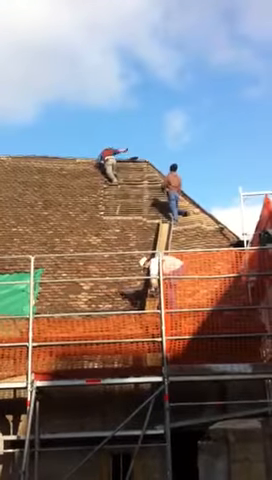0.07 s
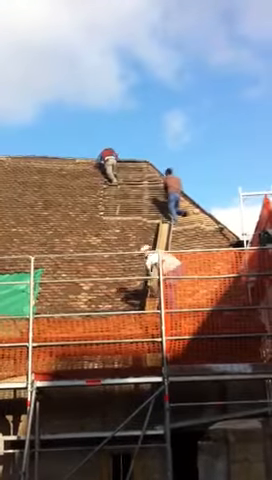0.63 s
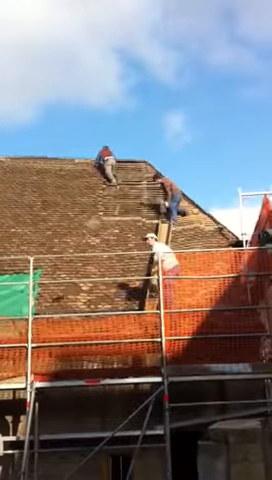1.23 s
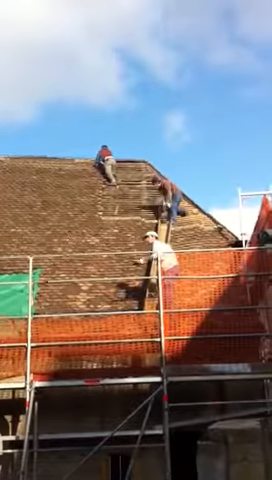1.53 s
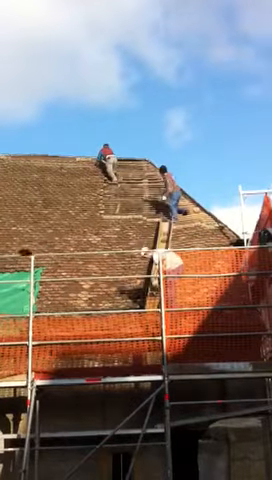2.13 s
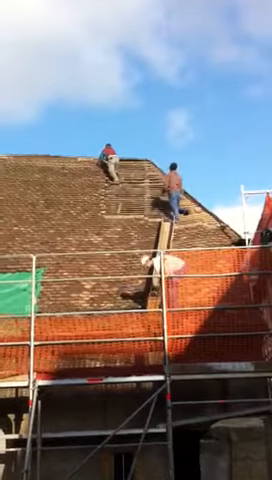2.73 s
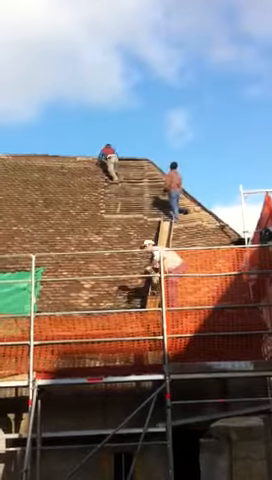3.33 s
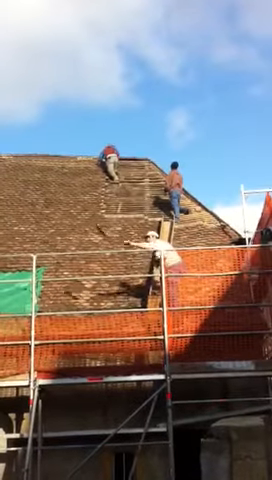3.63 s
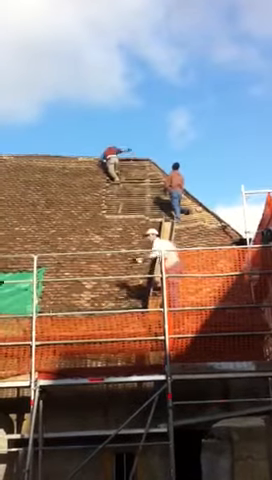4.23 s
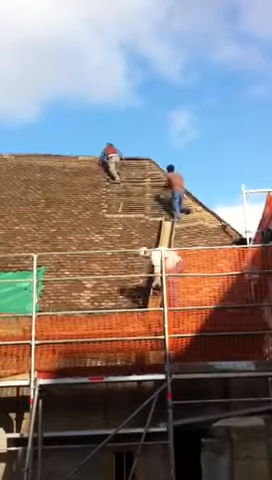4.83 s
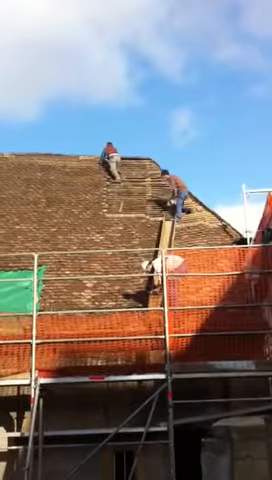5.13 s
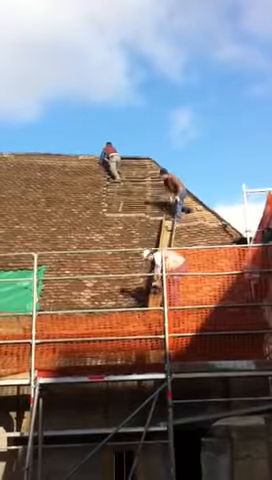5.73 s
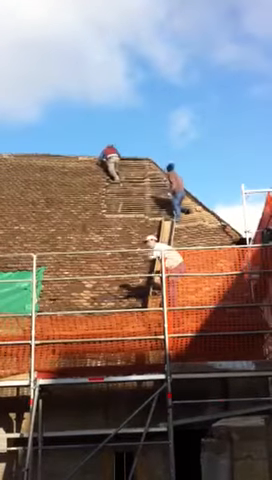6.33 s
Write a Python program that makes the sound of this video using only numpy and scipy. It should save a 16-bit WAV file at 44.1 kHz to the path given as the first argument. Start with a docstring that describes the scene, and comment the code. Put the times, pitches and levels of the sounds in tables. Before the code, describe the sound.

On an outdoor building site, roof tiles smash onto a pile at uneven intervals, each a sharp crack followed by a spray of ringing fragments and a trailing echo. The pile thuds and rumbles, and small pieces tumble and clink between crashes. Twice, before the loudest smash and again near the end, a run of dull knocks and grainy rubbing comes right at the microphone. The background is faint air.

```python
"""Clay tiles crash onto a heap and burst into rattling shards as workers toss them off a roof.
Each smash is a crack, then a spray of tiny fractures and ringing fragments. Some land with a low thud,
the heap rumbles as it settles, loose pieces clink, and the house fronts answer with a long tail.
Dull, hollow-sounding knocks, rubbing and dry ticks come close to the microphone, like handling noise,
over faint outdoor air."""
import sys
import numpy as np
from scipy import signal
from scipy.fft import rfft, irfft
from scipy.io import wavfile
from scipy.ndimage import uniform_filter1d

SR = 44100
rng = np.random.default_rng(int(sys.argv[2]) if len(sys.argv) > 2 else 0)


def wrap_up_sound(samples):
    """Save the sound to the file named by the first command line argument, as 16-bit audio."""
    columns = np.atleast_2d(samples).T
    # keep every value between -1 and 1, then stretch to whole-number steps
    tamed = np.clip(columns, -1, 1)
    steps = np.round(tamed * 32767).astype(np.int16)
    wavfile.write(sys.argv[1], SR, steps)


N = 285327
TIME = np.arange(SR) / SR  # one second, the canvas for a single hit
FREQS = np.fft.rfftfreq(SR, 1 / SR)


def amp(db):
    """Decibels to gain."""
    return 10 ** (np.asarray(db) / 20)


def unit_rms(x):
    """Scales a signal to an rms of 1."""
    return x / np.sqrt(np.mean(x ** 2) + 1e-20)


def curve_at(points, hz):
    """Reads a curve along a log-frequency axis."""
    point_hz, values = np.transpose(points)
    return np.interp(np.log(hz + 1), np.log(point_hz + 1), values)


def fade(t60, t=TIME):
    """A decay that falls 60 dB in t60 seconds."""
    return np.exp(-np.log(1000) * t / np.maximum(t60, 1e-4))


def add(mix, start, sound):
    """Drops a sound into the mix at start seconds."""
    part = mix[max(round(start * SR), 0):][:len(sound)]
    part += sound[:len(part)]


def mode(hz, t60):
    """One resonance ringing out."""
    return np.sin(2 * np.pi * hz * TIME) * fade(t60)


def clicks(per_s, spread_db, size):
    """Random contacts of either sign, a few much harder than the rest."""
    strength = amp(spread_db * np.minimum(rng.exponential(1, size), 4))
    return strength * rng.choice([-1, 1], size) * (rng.random(size) < per_s / SR)


def excite(drive, resonance):
    """Plays a signal through a resonance scaled to unit energy."""
    return signal.oaconvolve(drive, resonance / np.linalg.norm(resonance))[:N]


def snap(hz, t60, octaves=0.67, grit_db=2.9):
    """A dry snap: a short spill of tiny cracks in a broad band around its pitch."""
    band = unit_rms(np.exp(-.5 * (np.log2((FREQS + 1) / hz) / octaves) ** 2))
    cracks = unit_rms(clicks(8100, grit_db, SR)) * fade(t60)
    cracks = np.roll(cracks, 44)  # 1 ms of room for the filtered attack
    return .4 * irfft(rfft(cracks) * band, SR)[:SR // 2]


def shard(ring_s=0.043, count=14):
    """A broken piece rings briefly at its own random pitches."""
    t = TIME[:SR // 8]
    hz = FREQS[-1] * rng.uniform(0.02031, .7, (count, 1))
    t60 = ring_s * rng.uniform(0.28, 0.82, (count, 1))
    return (np.sin(2 * np.pi * hz * t) * fade(t60, t)).sum(0)


def rattle(cracks_per_s=2200, ring_db=-3, shards=10):
    """A second of breaking clay: dense cracks, and shards that ring as they collide."""
    cracks = unit_rms(clicks(cracks_per_s, 3.0, SR))
    rings = sum(signal.fftconvolve(clicks(120, 2.2, SR), shard())[:SR] for _ in range(shards))
    return cracks + amp(ring_db) * unit_rms(rings)


# The EQ of breaking clay. Each row: frequency in Hz, gain in dB.
SHATTER_EQ = [(24, -88), (40, -48), (180, -3.5), (249, -8.5), (297, -2.5), (329, -10), (363, -10),
              (392, -6), (630, -5), (873, -8), (1630, -6.5), (2150, -10.5), (3220, -11), (8770, -33),
              (16000, -46.5)]
# Band centres in Hz: bass, body, mids, treble, fizz.
SHATTER_BANDS_HZ = [160, 550, 1900, 5200, 11000]


def shatter(swell_s, t60, bands_db, first_touch=.16, treble_hurry=0.32, ripple_db=1.92):
    """The rattle swells as the tile breaks up and dies away, the treble first."""
    # the pieces under each tile resonate differently, in bands about 100 Hz wide
    ripple = uniform_filter1d(rng.standard_normal(len(FREQS)), size=110)
    ripple = unit_rms(uniform_filter1d(ripple, size=60))
    spectrum = rfft(rattle()) * amp(curve_at(SHATTER_EQ, FREQS) + ripple_db * ripple)
    attack = np.minimum(first_touch + (1 - first_touch) * TIME / swell_s, 1)
    since_swell = np.maximum(TIME - swell_s, 0)
    out = np.zeros(SR)
    for hz, db, share in zip(SHATTER_BANDS_HZ, bands_db, np.eye(len(SHATTER_BANDS_HZ))):
        crossover = curve_at(list(zip(SHATTER_BANDS_HZ, share)), FREQS)
        band = unit_rms(irfft(spectrum * crossover, SR))
        band_t60 = t60 * min(1, 2500 / hz) ** treble_hurry
        out += amp(db) * band * fade(band_t60, since_swell)
    return amp(-3.5) * attack * out


# Tiles hitting the heap. Each row: start in seconds, level in dB, opening gain of the swell from 0 to 1,
# swell in seconds, t60 in seconds, echo send in dB, then bass, body and treble in dB against the mids.
SMASHES = [ (0.000, -49, 0.48, .002, 0.33, -5, 7, 4, -3.5),
           (0.459, -21, 0.27, 0.035, 0.38, -17.5, -7.5, -10.5, 5.5),
           (2.185, -11.5, 0.58, .028, 0.53, -17.5, -20, 1, -2),
           (2.602, -36, 0.88, 0.01, 0.93, -9, 10.5, 11, 2.5),
           (2.644, -24.5, 0.28, 0.0045, 0.21, -11, -12.5, -1, 2),
           (2.674, -24, 0.42, 0.014, 0.46, -20.5, 7.5, 2.5, -1),
           (2.913, -14.5, 0.13, 0.055, 0.4, -15, 0, -1.5, -4),
           (4.875, -25.5, 0.47, 0.0043, 0.61, -17.5, -12, -8.5, -7.5),
           (4.891, -17, 0.49, 0.034, 0.37, -18.5, -16.5, -17.5, -5),
           (5.610, -22, 0.087, 0.042, 0.42, -15.5, -6, -6.5, -3.5)]


def smashes(fizz_db=-11, crack_db=-7):
    """Each tile lands with a crack and breaks up; returns the direct sound and the echo send."""
    direct, send = np.zeros((2, N))
    for start, db, touch, swell_s, t60, send_db, bass_db, body_db, treble_db in SMASHES:
        colour_db = np.array([bass_db, body_db, 0, treble_db, treble_db + fizz_db])
        burst = shatter(swell_s, t60, db + colour_db, first_touch=touch)
        add(burst, 0, amp(db + crack_db) * snap(hz=2100, t60=0.029))
        add(direct, start, burst)
        add(send, start, amp(send_db) * burst)
    return direct, send


def chatter(hz, length_s):
    """A shard chatters as it settles; each contact feeds the same dying mode."""
    contacts = clicks(900, 0.75, SR) * fade(length_s * 0.75)
    ring = signal.fftconvolve(contacts, mode(hz, length_s * .4))[:SR]
    return ring / (abs(ring).max() + 1e-12)


# Small shards. Each row: start in seconds, peak in dB, pitch in Hz, rough length in seconds.
SHARD_CLINKS = [(0.0, -49, 2654, 0.58), (0.0, -51, 4060, 0.34), (0.758, -39.5, 4850, 0.15),
                (0.755, -46.5, 5790, 0.31), (0.922, -43.5, 3600, .12), (0.924, -52, 3114, 0.22),
                (2.870, -39.5, 4480, 0.64), (4.299, -52, 1201, 0.82), (5.754, -50, 3960, .12)]


def clinks():
    """Small shards bounce and ring, one bright note each."""
    out = np.zeros(N)
    for start, db, hz, length_s in SHARD_CLINKS:
        add(out, start, amp(db) * chatter(hz, length_s))
    return out


# The colour of the outdoor bed. Each row: frequency in Hz, gain in dB.
AIR_EQ = [(18, -84), (30, -22.5), (109, -6), (204, 1.5), (280, -4), (404, -5), (540, -6), (600, -9),
          (1070, -9.5), (1220, -12.5), (1390, -14), (3310, -23), (3670, -23), (16000, -36)]


def air(level_db=-56.5, patchy_db=1.5):
    """Distant outdoor noise that drifts in patches."""
    hz, _, spectra = signal.stft(rng.standard_normal(N), SR, nperseg=2048)
    drift = uniform_filter1d(rng.standard_normal(spectra.shape), size=6, axis=1)
    patches = unit_rms(uniform_filter1d(drift, size=20, axis=0))
    spectra *= amp(curve_at(AIR_EQ, hz)[:, None] + patchy_db * patches)
    return amp(level_db) * unit_rms(signal.istft(spectra, SR)[1][:N])


# The long tail off the house fronts. Each row: frequency in Hz, t60 in seconds.
STREET_DECAY = [(150, 1.22), (600, 1.83), (2000, 1.16), (5000, 0.95), (10000, 0.82), (15000, 0.28)]


def echo(send, decay=STREET_DECAY, build_s=0.05, per_s=4000):
    """Scattered reflections build up, then each band dies at its own speed."""
    build = np.minimum(np.arange(2 * SR) / SR / build_s, 1) ** 2
    reflections = clicks(per_s, 0.63, 2 * SR) * build
    hz, t, spectra = signal.stft(reflections, SR, nperseg=256)
    spectra *= fade(curve_at(decay, hz)[:, None], t)
    tail = signal.istft(spectra, SR, nperseg=256)[1]
    return excite(send, tail)


# The low modes of the heap. Each row: pitch in Hz, level in dB.
HEAP_MODES = [(130, -12), (155, -3.5), (177, 9), (208, 2.5), (300, -4), (366, -4.5), (432, -1), (560, -9),
              (700, -6.5)]


def rumble(level_db=-9, per_s=160, rise_s=0.29, settle_t60=1.33):
    """Pieces shift inside the heap and bump its low modes, more so after a full-bodied smash."""
    settling = np.minimum(TIME / rise_s, 1) * fade(settle_t60)
    load = np.zeros(N)
    for start, db, *_, body_db, _ in SMASHES:
        add(load, start, amp(db + body_db) * settling)
    ring = sum(amp(db) * mode(hz, t60=.15) for hz, db in HEAP_MODES)
    bumps = load * unit_rms(clicks(per_s, 2.1, N))
    return amp(level_db) * excite(bumps, ring)


def chips(level_db=-48, per_s=500, flight_s=0.26, spread_s=.08):
    """Tiny chips thrown up by each smash patter down, louder after a hard one."""
    landing = np.exp(-.5 * ((TIME - flight_s) / spread_s) ** 2)
    shower = np.zeros(N)
    for start, db, *_ in SMASHES:
        add(shower, start, amp(db) * landing)
    chip = snap(hz=9550, t60=.04, octaves=0.88)
    patter = shower * unit_rms(clicks(per_s, 1.5, N))
    return amp(level_db) * excite(patter, chip)


# Loose pieces on the move. Each row: start in seconds, level in dB.
LOOSE_TUMBLES = [(0.335, -51), (3.29, -38.5), (5.071, -37), (5.207, -35.5), (5.274, -41.5), (6.197, -41)]
# Their colour in dB: bass, body, mids, treble, fizz.
TUMBLE_COLOUR_DB = [-6, -51.5, -1, -5.5, -15.5]


def tumbles():
    """Loose pieces tumble over the heap in short, quiet rattles."""
    out = np.zeros(N)
    for start, db in LOOSE_TUMBLES:
        add(out, start, amp(db) * shatter(swell_s=0.016, t60=0.33, bands_db=TUMBLE_COLOUR_DB))
    return out


# Dry ticks. Most are close-up grit; the 2.187 s row is the bright crack of the smash landing then, and the
# 2.433 s row is a chip thrown up by it. # Each row: start in seconds, level in dB, pitch in Hz, t60 in seconds.
DRY_TICKS = [(0.346, -39, 1120, 0.17), (1.171, -36.5, 1470, 0.011), (1.815, -25.5, 3050, 0.028),
             (1.865, -35, 4380, .033), (1.877, -33, 4000, 0.11), (2.126, -41, 4540, 0.077),
             (2.187, -22, 14000, .13), (2.433, -34, 12200, 0.18), (3.074, -33, 10400, .02),
             (3.204, -36, 10700, .017), (3.581, -26, 1310, 0.14), (3.58, -29, 4570, 0.044),
             (3.599, -27, 3200, 0.041), (5.75, -21, 1400, 0.53), (5.755, -21, 4100, 0.034),
             (6.117, -20.5, 2680, 0.075), (6.144, -34.5, 8250, 0.056), (6.422, -40, 3980, .03)]


def ticks():
    """Dry, gritty ticks, each a spill of tiny cracks; most are nearby, a few belong to a smash."""
    out = np.zeros(N)
    for start, db, hz, t60 in DRY_TICKS:
        add(out, start, amp(db) * snap(hz, t60))
    return out


# Low booms. Most rows are heavy landings on the heap; the rows at 3.696 s and 6.428 s are the low body of close
# knocks. # Each row: start in seconds, level in dB, pitch in Hz, t60 in seconds.
LOW_THUDS = [(0.464, -11, 184.8, .12), (0.494, -18.5, 190.4, .12), (2.678, -7.5, 160, 0.068),
             (2.961, -21, 177, 0.23), (3.696, -23.5, 193, 0.1), (4.882, -13, 146, 0.05),
             (5.629, -9.5, 150.6, 0.023), (6.428, -20.5, 252.4, 0.091)]


def thuds(attack_s=0.0052):
    """A low note with a faint octave: the heap booming under a heavy piece, or the low body of a close knock."""
    attack = 1 - np.exp(-TIME / attack_s)
    out = np.zeros(N)
    for start, db, hz, t60 in LOW_THUDS:
        boom = mode(hz, t60) + 0.16 * mode(2 * hz, t60)
        add(out, start, amp(db) * attack * boom)
    return out


def dull_knock(hz, peak_s=0.0028):
    """A dull, hollow-sounding knock: a few cycles that swell and die."""
    t = TIME[:SR // 20]
    swell = (t / peak_s * np.exp(1 - t / peak_s)) ** 2
    return swell * np.sin(2 * np.pi * hz * t)


# Knocks close to the microphone, like handling noise. Each row: start in seconds, level in dB,
# pitch in Hz, t60 in seconds of the handling envelope that follows.
CLOSE_KNOCKS = [(1.797, -11.5, 570, 0.17), (1.812, -7, 730, 0.14), (1.825, -13.5, 765, 0.074),
                (1.833, -14.5, 416, 0.45), (1.885, -22, 602, .3), (1.994, -14, 527, 0.086),
                (2.009, -17, 432, 0.16), (2.061, -15.5, 520, 0.049), (2.091, -10.5, 567, 0.054),
                (2.11, -15.5, 460, .45), (3.579, -21, 626, 0.69), (3.70, -25, 360, 0.15),
                (5.735, -12.5, 516, 0.15), (5.753, -2.5, 649, 0.13), (5.770, -17, 710, 0.6),
                (5.938, -18.5, 613, 0.27), (5.972, -18.5, 586, 0.2), (6.033, -20, 550, 0.19),
                (6.078, -23.5, 610, 0.18), (6.112, -18.5, 370, 0.38), (6.183, -23.5, 537, 0.39),
                (6.259, -24.5, 486, 0.62), (6.339, -35, 390, .9), (6.415, -30, 470, 0.27)]


def knocks(edge_db=-11):
    """Each knock is a dull note with a hard edge, a snap pitched just above it."""
    out = np.zeros(N)
    for start, db, hz, _ in CLOSE_KNOCKS:
        add(out, start, amp(db) * dull_knock(hz))
        add(out, start, amp(db + edge_db) * snap(1.2 * hz, t60=.03))
    return out


def handling_envelope():
    """The level of the small knocks and rubbing: it jumps at each big knock and dies away."""
    handling = np.zeros(N)
    for start, db, _, t60 in CLOSE_KNOCKS:
        add(handling, start, amp(db) * fade(t60) * (1 - fade(0.01)))
    return handling


def small_knocks(handling, level_db=-13.5, per_s=35, pitches=9):
    """Small knocks of mixed pitch fill the gaps between the big ones."""
    out = np.zeros(N)
    for hz in np.geomspace(270, 800, pitches):
        bumps = handling * unit_rms(clicks(per_s, 1.0, N))
        out += excite(bumps, dull_knock(hz))
    return amp(level_db) * out / np.sqrt(pitches)


# The colour of the rubbing. Each row: frequency in Hz, gain in dB.
RUB_EQ = [(40, -55), (150, -32.5), (600, 1.5), (1100, -3), (2000, -13.5), (4500, -25.5), (9000, -42.5),
          (16000, -45)]


def rubbing(handling, level_db=-13, steepness=1.424):
    """Grainy rubbing up close: fine contacts whose level grows faster than the knocks do."""
    contacts = clicks(3000, 2.0, N)
    colour = amp(curve_at(RUB_EQ, np.fft.rfftfreq(N, 1 / SR)))
    grain = unit_rms(irfft(rfft(contacts) * colour, N))
    return amp(level_db) * handling ** steepness * grain


# The modes of a big piece of tile. Each row: pitch in Hz, level in dB, rough length in seconds.
TILE_MODES = [(1459, -2, .42), (1590, -5, .25), (2185, 0, .36), (2285, -5, .36), (2724, -8, .25),
              (2815, -10, .45), (3321, -8, .45), (3784, -5, .3), (3950, -6, .3), (4960, -9, .4),
              (5292, -14, .4), (6158, -15, .3)]
# Blows on that piece. Each row: start in seconds, level in dB, pitch ratio applied to the modes.
TILE_BLOWS = [(3.305, -41, .95), (4.912, -24, 1.171), (5.198, -48, 1), (5.217, -33, 1), (5.256, -44, 1),
              (5.288, -44, 1)]


def tile_rings():
    """Half a tile rings with the same modes, chattering differently at each blow."""
    out = np.zeros(N)
    for start, db, ratio in TILE_BLOWS:
        for hz, mode_db, length_s in TILE_MODES:
            add(out, start, amp(db + mode_db) * chatter(ratio * hz, length_s))
    return out


def scene():
    """The mono mix: tiles in the street, knocks and ticks up close, two echoes and the air."""
    smashing, smash_send = smashes()
    tumbling = tumbles()
    pieces = thuds() + clinks() + tile_rings()
    handling = handling_envelope()
    near = knocks() + ticks() + small_knocks(handling) + rubbing(handling)
    tiles = smashing + tumbling + chips() + rumble()
    scaffold = amp(-8) * echo(near + pieces, decay=[(200, .25), (8000, 0.04)], build_s=0.0034)
    house_fronts = echo(smash_send + amp(-11) * tumbling + amp(-20) * pieces + amp(-26) * near)
    return (tiles + pieces + near + scaffold + house_fronts + air())[None]


def record(dry, ceiling=0.93, low_cut_hz=105, high_cut_hz=15950):
    """The microphone thins the deep bass and rounds the highest peaks; a steep filter trims the top."""
    low_cut = signal.butter(3, low_cut_hz, "highpass", fs=SR, output="sos")
    thinned = signal.sosfilt(low_cut, dry) + amp(-30.5) * dry
    rounded = ceiling * np.tanh(thinned / ceiling)
    high_cut = signal.firwin(511, high_cut_hz, window=("kaiser", 9), fs=SR)
    return signal.oaconvolve(rounded, high_cut[None], "same")


dry = scene()
out = record(dry)
wrap_up_sound(out)
```